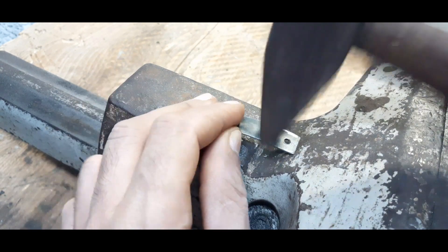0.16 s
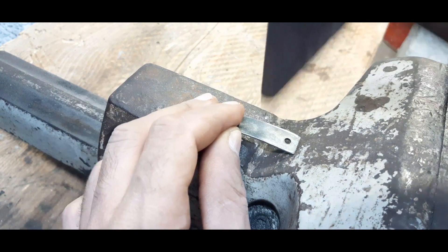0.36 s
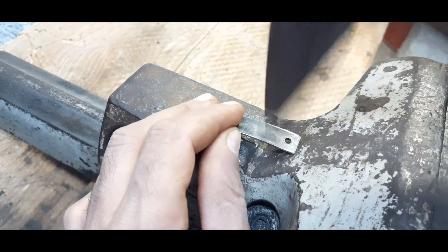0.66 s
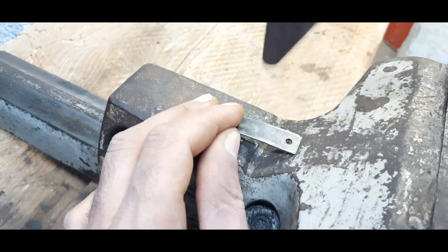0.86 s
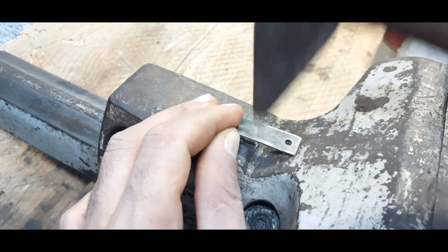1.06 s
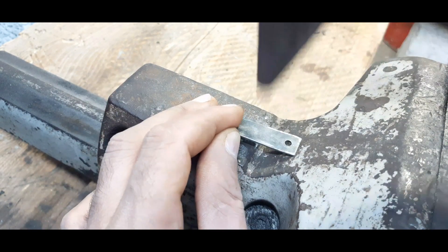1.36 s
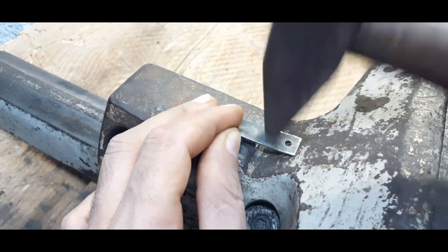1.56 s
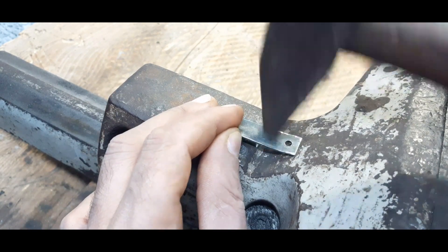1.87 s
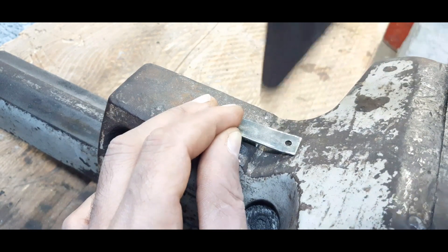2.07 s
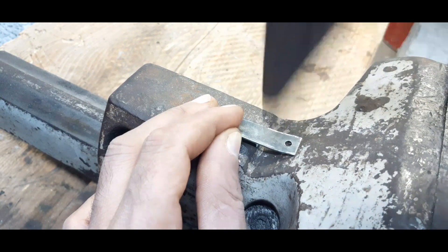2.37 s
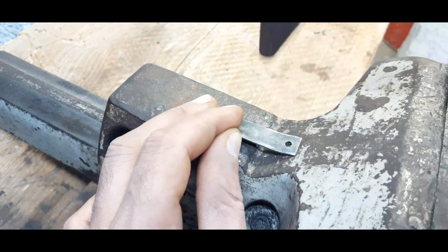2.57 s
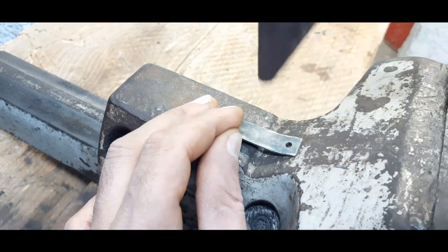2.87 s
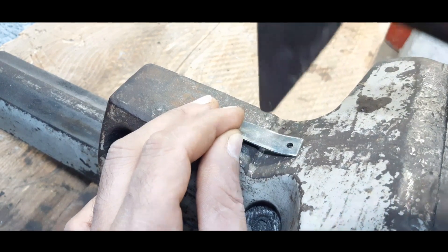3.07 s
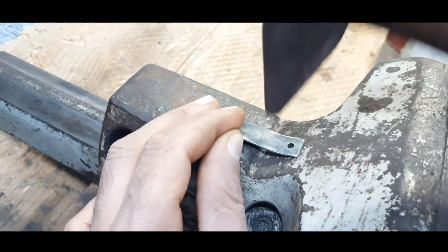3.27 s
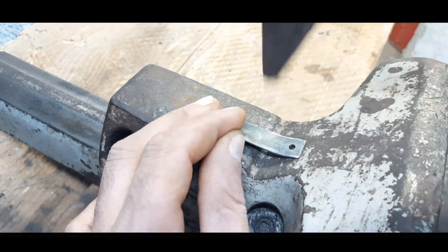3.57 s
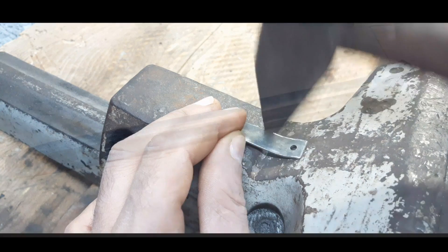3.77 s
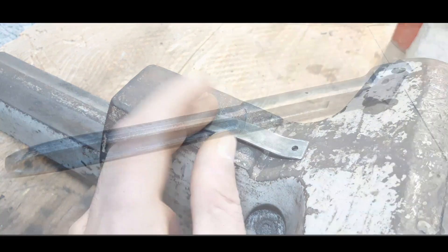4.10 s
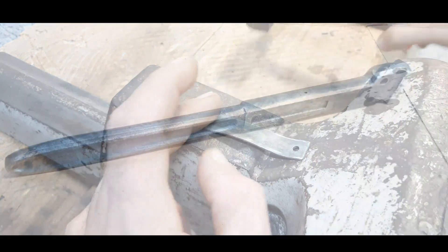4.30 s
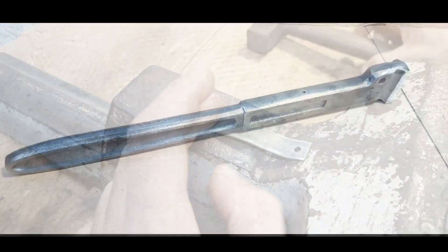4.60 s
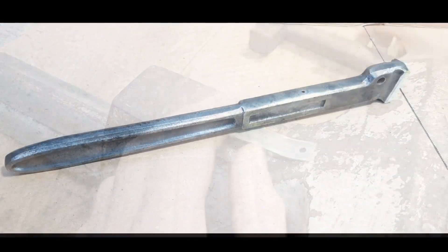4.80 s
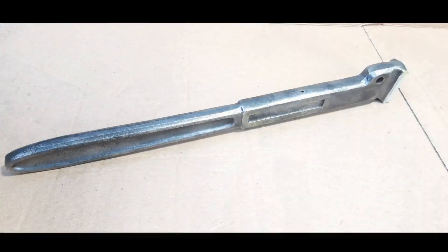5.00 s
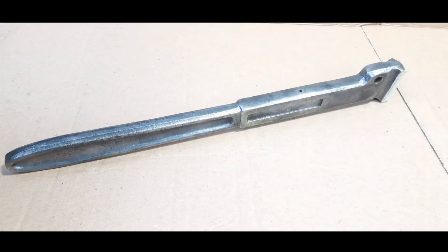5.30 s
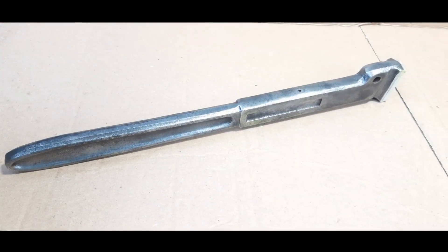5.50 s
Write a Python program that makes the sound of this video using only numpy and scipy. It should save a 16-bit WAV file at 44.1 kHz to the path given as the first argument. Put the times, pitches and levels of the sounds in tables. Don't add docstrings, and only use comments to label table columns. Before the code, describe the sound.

Close stereo microphones, about a hand's length away, catch a hammer tapping a thin metal strip on a vise anvil. Bright, dry clinks with tiny bounces come about every 0.28 seconds, with dull bench knocks growing heavier. The workshop reverberates over a low rumble, with very faint birds. After a pause near three seconds, two more blows fall; then the sound cuts to quieter, airy room tone with a faint short hum.

```python
import sys
import numpy as np
from scipy import signal
from scipy.fft import rfft, irfft, next_fast_len
from scipy.io import wavfile
from scipy.ndimage import uniform_filter1d

SR = 44100
rng = np.random.default_rng(int(sys.argv[2]) if len(sys.argv) > 2 else 0)


def gain_from_decibels(decibels):
    exponent = np.asarray(decibels, float) / 20
    return 10 ** exponent


def file_out(sig):
    cols = np.atleast_2d(sig).T
    lim = np.clip(cols, -1, 1)
    pcm = np.round(lim * 32767).astype(np.int16)
    wavfile.write(sys.argv[1], SR, pcm)


N = 249165
LEAD = SR // 10
T = np.arange(N + LEAD) / SR
AIRY_FROM_S = 4.388


def add(out, x, at_s):
    i = int(round(at_s * SR)) + LEAD
    out[..., i:i + x.shape[-1]] += x


def on_log(hz, table):
    table_hz, value = np.transpose(table)
    return np.interp(np.log(hz), np.log(table_hz), value)


def walk(rate):
    k = int(SR / rate)
    held = np.repeat(rng.standard_normal(N // k + 1), k)
    return 2.2 * uniform_filter1d(uniform_filter1d(held, k), k)[:N]


def bands(table, size, alike_hz):
    hz = np.maximum(np.arange(size // 2 + 1) * SR / size, 1)
    mid, side = rfft(rng.standard_normal((2, size))) * gain_from_decibels(on_log(hz, table))
    alike = .9 / (1 + (hz / alike_hz) ** 2)
    pair = mid * np.sqrt(1 + alike) + side * np.sqrt(1 - alike) * np.array([[1], [-1]])
    for step in range(13, 43):
        share = np.cos(np.pi / 2 * np.clip(3 * np.log2(hz) - step, -1, 1)) ** 2
        yield 2 ** (step / 3), irfft(pair * share, size)


# pitch_hz [Hz], width_hz [Hz], level_db [dB]
STRIP_MODES = [(2350, 1500, -20), (4750, 900, -16.5), (6250, 600, -10.5), (7930, 560, -9.5),
               (8380, 1100, -3.5), (10560, 1100, -7), (11000, 1100, -17), (11700, 1500, -3.5),
               (12780, 620, -3), (13600, 900, 0), (13680, 640, -4.5), (15060, 766, -7)]


def ticks(contacts):
    out, t = np.zeros((2, len(T))), T[:SR // 40]
    hz, width_hz, db = np.transpose(STRIP_MODES)[:, :, None]
    for s, tick_db, pan_db, knock_db in contacts:
        chance = rng.standard_normal((4,) + hz.shape)
        phase = 2 * np.pi * hz * (1 + 0.023 * chance[0]) * t + 2 * chance[1]
        uneven_db, across = 2.5 * chance[2], 2.2 + .6 * chance[3]
        attack = 1 - np.exp(-t / .0001)
        fade = gain_from_decibels(db + uneven_db) * np.exp(-.6 * np.pi * width_hz * t) * attack
        ring = np.array([(fade * np.sin(phase + across)).sum(0), (fade * np.sin(phase)).sum(0)])
        crack = np.diff(rng.standard_normal((2, len(t) + 1)))
        ring += gain_from_decibels(-15) * crack * np.exp(-t / 0.0014)
        ring *= gain_from_decibels(np.array([[pan_db], [-pan_db]]) / 2) / np.abs(ring).max(1, keepdims=True)
        push = np.exp(-((t - .0002) / 0.000097) ** 2) - 0.67 * np.exp(-((t - .0007) / 0.00036) ** 2)
        knock = gain_from_decibels(tick_db + knock_db + 2.5) * push * np.array([[.3], [1]])
        add(out, gain_from_decibels(tick_db + 2.0) * ring + knock, s - .0002)
    return out


# pitch_hz [Hz], level_db [dB], t60_s [s]
BENCH_MODES = [(60.8, -9.5, 0.51), (84.15, -12.5, 0.46), (110.4, -13.5, 0.38), (178.2, -8, 0.12),
               (218, -12.5, 0.22), (252.3, -0.5, 0.17), (298.7, -2.5, 0.17), (336.1, -8, 0.063),
               (348.7, -3.5, 0.16), (417, -11.5, 0.13), (528.5, -11, 0.075), (659, -7, 0.087),
               (702.6, 1.5, 0.057), (748, 1.5, 0.055), (845, -2.5, 0.07), (933, -10, 0.16),
               (1027, -15, 0.091), (1213, -19, 0.1), (1486, -16, 0.068), (1966, -25.5, 0.061),
               (2973, -25.5, 0.14)]


def bench(blows, late_s=0.0075, rise_cycles=2.3):
    out, t = np.zeros((2, len(T))), T[:SR // 3]
    hz, db, t60 = np.transpose(BENCH_MODES)[:, :, None]
    start, lead = rng.standard_normal((2,) + hz.shape)
    apart = (.15 + hz / 1000) * lead
    for s, boom_db, top_db, thud_db, decay in blows:
        chance = rng.standard_normal((3,) + hz.shape)
        bench_top_db = np.where(hz > 550, top_db + 15, 0)
        floor_db = np.where(hz < 140, thud_db + 23.5, 0)
        db_now = db + bench_top_db + floor_db + 2.0 * chance[0]
        fade = gain_from_decibels(db_now - 60 * t / (t60 * decay)) * (1 - np.exp(-t * hz / rise_cycles))
        phase = 2 * np.pi * hz * (1 + 0.0077 * chance[1]) * t + 0.67 * start + 0.51 * chance[2]
        boom = np.array([(fade * np.sin(phase + apart)).sum(0), 1.15 * (fade * np.sin(phase)).sum(0)])
        loudness = np.sqrt(np.mean(boom[:, :SR // 20] ** 2))
        add(out, boom * gain_from_decibels(boom_db - 4.5) / loudness, s + late_s)
    return out


# pitch_hz [Hz], level_db [dB]
WALL_COLOUR = [(40, -3), (100, 5.5), (300, 1), (800, 2.5), (1500, 1), (2500, 1.5), (3600, -2.5),
               (5500, -2.5), (8200, -0.5), (10200, -6), (12600, 5), (14500, 2), (15800, -7), (17000, -31.5)]
# pitch_hz [Hz], t60_s [s]
WALL_T60 = [(60, 0.42), (300, 0.49), (1000, 0.52), (2500, 0.44), (5000, 0.45), (9000, 0.38), (16000, 0.25)]


def room(source, ring_db=-9, near_db=-8, far_s=0.13, far_db=-4):
    t, response = T[:SR], 0
    far = 1 + gain_from_decibels(far_db) * np.exp(-((t - far_s) / .035) ** 2)
    quick = gain_from_decibels(near_db - 60 * t / .03) * (1 - np.exp(-t / .001))
    for hz, noise in bands(WALL_COLOUR, len(t), alike_hz=535):
        slow = far * gain_from_decibels(ring_db - 60 * t / on_log(hz, WALL_T60)) * (1 - np.exp(-t / .012))
        power = noise ** 2 + 1e-18
        even = np.sqrt(power.mean() / uniform_filter1d(power, size=int(6 * SR / hz), axis=1))
        lean_db = np.clip(np.log2(hz / 700), -1.5, .8) * np.array([[1], [-1]])
        response = response + noise * even * (slow + quick) * gain_from_decibels(lean_db)
    t = T[:SR // 25]
    wall = rng.standard_normal(len(t)) * (np.exp(-t / 0.0002) + 0.24 * np.exp(-t / 0.011))
    wall_at = int(.0275 * SR)
    response[:, wall_at:wall_at + len(t)] += np.array([[1.3], [.6]]) * wall
    response = signal.sosfilt(signal.ellip(8, .5, 50, 15900, fs=SR, output="sos"), response)
    return signal.fftconvolve(source[None], response * gain_from_decibels(-24.0), axes=1)[:, :len(T)]


# start_s [s] of the touch, touch_db [dB], landing_db [dB], rebound_ms [ms], rebound_db [dB]
STRIKE_CONTACTS = [(-.05, -3, -7, 4.7, -21), (0.233, -10, -11.5, 3.7, -14), (0.5074, -9.5, -25, 2.6, -17),
                   (0.782, -7, -6, 6.2, -8.5), (1.0662, -4.5, -9.5, 6.7, -14), (1.351, -19, -5, 11, -18),
                   (1.64, -11, 0.5, 6.3, -4.5), (1.9296, -19.5, -9.5, 6.1, -18.5),
                   (2.2076, -1.5, -17, 4.9, -16), (2.4892, -4.5, -16, 6.3, -15.5),
                   (2.7807, -2.5, -12.5, 7, -13), (3.5122, -12, -6.5, 7.6, -13),
                   (3.8208, -7.5, -16.5, 6.1, -15)]
# boom_db [dB], top_db [dB over boom], knock_db [dB], decay [factor]
BENCH_BLOWS = [(-38, -26, -39.5, 0.22), (-36.5, -24.5, -35.5, 0.44), (-36, -25.5, -39.5, 0.62),
               (-28, -29.5, -26, 0.69), (-33.5, -27, -31.5, 2.4), (-25.5, -33, -28.5, 0.52),
               (-23, -19.5, -10.5, 0.59), (-23, -20.5, -17, 1.1), (-23.5, -20.5, -23, 0.58),
               (-20.5, -15, -17, .34), (-23, -15.5, -19, 0.76), (-28, -16, -12, 0.85),
               (-20.5, -17.5, -17, 0.49)]


def hammer():
    landing_s, settle_share, settle_db = .0012, .45, -11.5
    floor_thud_db = -54.5
    s, touch_db, landing_db, rebound_ms, rebound_db = np.transpose(STRIKE_CONTACTS)
    boom_db, top_db, knock_db, decay = np.transpose(BENCH_BLOWS)
    rebound_s = rebound_ms / 1000
    tick_db = np.array([touch_db, landing_db, rebound_db, rebound_db + settle_db])
    knock_db = knock_db - tick_db.max(0)
    # delay s, pan dB, extra knock dB
    stages = [(0 * s, 1, 0.023), (0 * s + landing_s, -7, 0.017),
              (rebound_s, -4.5, 2), ((1 + settle_share) * rebound_s, -3.5, 1.8)]
    contacts = []
    for (after_s, pan_db, extra_db), level_db in zip(stages, tick_db):
        contacts += zip(s + after_s, level_db, 0 * s + pan_db, knock_db + extra_db)
    strip = ticks(contacts)
    wood = bench(list(zip(s - .001, boom_db, top_db, floor_thud_db - boom_db, decay)))

    snap, force = np.zeros(len(T)), np.sqrt((gain_from_decibels(tick_db) ** 2).sum(0))
    for at_s, size in zip(s, force):
        add(snap, size * np.array([1., -.75]), at_s)
    share = gain_from_decibels(-6 + 0.3 * (boom_db + 27.5)) / force
    blow_now = np.clip(np.searchsorted(s - .01, T - LEAD / SR) - 1, 0, None)
    thrown = share[blow_now] * (0.12 * strip[1] + 0.87 * snap)
    flutter_db = 3.5 * np.resize(walk(70), len(T))
    walls = room(thrown + gain_from_decibels(-4 + flutter_db) * wood[1])
    return (strip + wood + walls)[:, LEAD:]


# pitch_hz [Hz], level_db [dB per Hz]
SHOP_COLOUR = [(15, -50.5), (25, -20.5), (58, -5.5), (129, -20), (164, -16), (269, -22.5), (300, -10),
               (383, -32.5), (822, -34.5), (1580, -52), (2880, -55.5), (4710, -77.5), (14000, -64),
               (17000, -73)]
# start_s [s], level_db [dB]
SHOP_LOUDNESS = [
    (0, -51.5),
    (3.5, -53.5),
    (4.0, -48),
    (4.3, -57),
    (4.39, -59.5),
    (4.6, -61.5),
    (5.65, -64.5),
]


def shop_air():
    shop, swell = 0, walk(0.8)
    for hz, noise in bands(SHOP_COLOUR, next_fast_len(N), alike_hz=700):
        shop = shop + noise[:, :N] * gain_from_decibels(1.2 * swell + 1.0 * walk(2.7))
    steady = shop / np.sqrt(np.mean(shop ** 2))
    return steady * gain_from_decibels(np.interp(T[:N], *np.transpose(SHOP_LOUDNESS)))


def glides(rows):
    edge, edge_db = .2, -17.5
    at = np.array([0, edge, 1 - edge / 2, 1])
    soft_db = np.array([edge_db, 0, 0, edge_db])
    return [np.transpose([s + length * at, a_hz + (b_hz - a_hz) * at, db + soft_db])
            for s, length, a_hz, b_hz, db in rows]


def arches(rows):
    rise_s, fall_s, sag_hz_per_s2 = .04, .07, 420000
    at = np.linspace(-rise_s, fall_s, num=12)
    soft_db = -17.5 / 2 * np.clip(-at / rise_s, 0, 1) ** 2
    return [np.transpose([s + at, hz - sag_hz_per_s2 * at ** 2, db + soft_db]) for s, hz, db in rows]


def notes(tables, partials, waver, rough_db):
    out = np.zeros(N)
    for table in tables:
        s, hz, db = np.transpose(table)
        span = slice(int(s[0] * SR), int(s[-1] * SR))
        t = T[span]
        pitch = uniform_filter1d(np.interp(t, s, hz), size=500) * (1 + waver * walk(100)[span])
        phase = 2 * np.pi * np.cumsum(pitch) / SR
        gain = gain_from_decibels(np.interp(t, s, db) + rough_db * walk(90)[span])
        out[span] += gain * sum(gain_from_decibels(d) * np.sin(k * phase) for k, d in partials)
    return out


# top_s [s], pitch_hz [Hz] of the upper overtone, level_db [dB]
BIRD_SQUEAKS = [
    (.15, 7700, -81),
    (2.412, 9300, -79),
    (2.708, 9400, -79),
]
# start_s [s], length_s [s], from_hz [Hz], to_hz [Hz], level_db [dB]
BIRD_WHISTLES = [
    (.99, .09, 2350, 2620, -78),
    (1.15, .19, 2620, 2680, -83),
    (1.52, .13, 2640, 2680, -81),
]


def birds():
    squeaks = notes(arches(BIRD_SQUEAKS), [(1, 0), (7 / 8, -2.5)], waver=0.004, rough_db=2.5)
    whistles = notes(glides(BIRD_WHISTLES), [(0.95, 0.0055)], waver=.014, rough_db=3.0)
    return (squeaks + whistles) * np.array([[1.2], [.8]])


# pitch_hz [Hz], level_db [dB per Hz]
AIRY_COLOUR = [(15, -48), (25, -35), (101, 1.5), (136, -18.5), (210, -8), (234, -12), (291, -11),
               (561, -16), (679, -11.5), (1720, -31), (11300, -45.5), (15200, -37), (17000, -74)]
# peak_s [s], length_s [s], pitch_hz [Hz], lift_db [dB]
PASSING_SWELLS = [(4.55, 0.13, 1920, 12), (4.57, 0.057, 4500, 5.5), (4.738, 0.048, 4600, 7),
                  (4.8, 0.11, 10080, 11), (4.8, 0.086, 800, 10.5), (5.0, .12, 4340, 1.5),
                  (5.08, 0.17, 1200, 8.5), (5.313, 0.038, 8000, 11.5), (5.45, 0.13, 940, 11),
                  (5.436, .13, 2036, 9), (5.52, 0.088, 6520, 11)]


def airy_room():
    out, airy, mean_power = np.zeros((2, N)), 0, 0
    swell_octaves, calm_db = .33, -3
    late = T[int(AIRY_FROM_S * SR):N]
    slow, since = late[::256], late - late[0]
    s, length, swell_hz, swell_db = np.transpose(PASSING_SWELLS)[:, :, None]
    for hz, noise in bands(AIRY_COLOUR, 2 * SR, alike_hz=348):
        mean_power += np.mean(noise ** 2)
        nearness = ((slow - s) / length) ** 2 + (np.log2(hz / swell_hz) / swell_octaves) ** 2
        lift_db = (swell_db * np.exp(-nearness)).sum(0)
        creep_db = -4.5 * np.exp(-since / 0.13) / (1 + (hz / 1200) ** 2)
        level_db = np.interp(late, slow, calm_db + lift_db) + creep_db + 1.2 * walk(7)[:len(late)]
        airy = airy + noise[:, :len(late)] * gain_from_decibels(level_db)
    click = uniform_filter1d(rng.standard_normal(len(late)), size=4) * np.exp(-since / .004)
    out[:, -len(late):] = airy * gain_from_decibels(-58) / np.sqrt(mean_power) + gain_from_decibels(-66.5) * click
    return out


# start_s [s], length_s [s], from_hz [Hz], to_hz [Hz], level_db [dB]
DRONE_GLIDE = [
    (4.93, 0.241, 667, 718, -58.5),
]


def drone():
    return notes(glides(DRONE_GLIDE), [(0.98, 0)], waver=0.0117, rough_db=4.0)


def scene():
    return hammer() + shop_air() + birds() + airy_room() + drone()


def roll_off(x):
    return signal.sosfilt(signal.butter(12, 17150, fs=SR, output="sos"), x)


def record(dry):
    hiss = gain_from_decibels(-80.5) * rng.standard_normal(dry.shape)
    heard = signal.sosfilt(signal.butter(2, 42, "high", fs=SR, output="sos"), dry + hiss)
    heard = signal.sosfilt(signal.ellip(8, .3, 70, 16250, fs=SR, output="sos"), heard)
    return roll_off(0.91 * np.tanh(heard / 0.88))


dry = scene()
out = record(dry)
file_out(out)
```